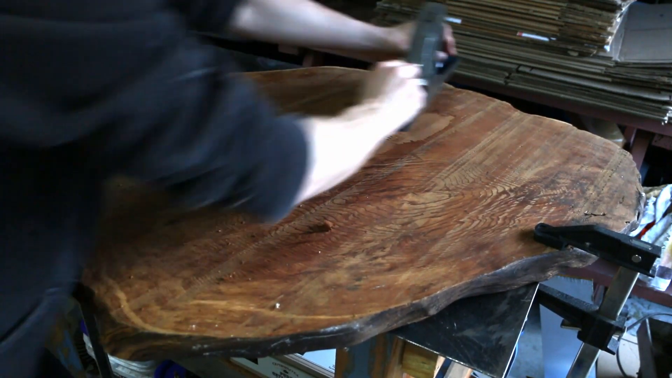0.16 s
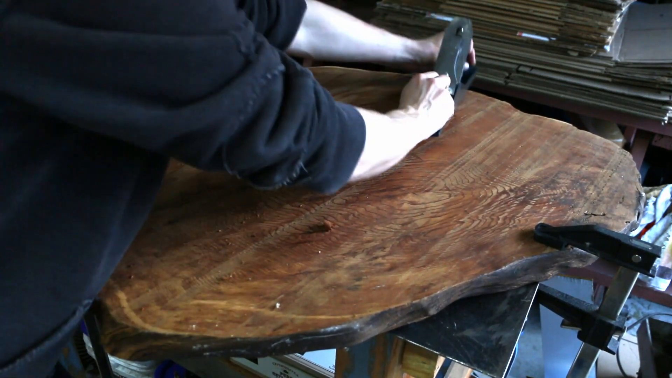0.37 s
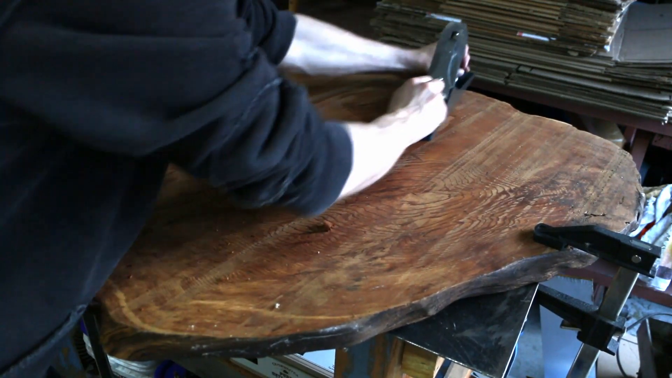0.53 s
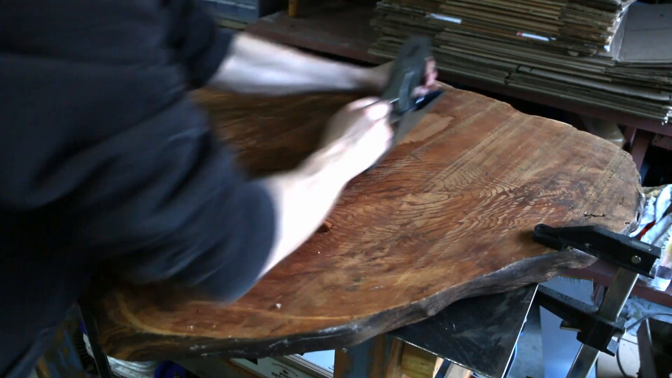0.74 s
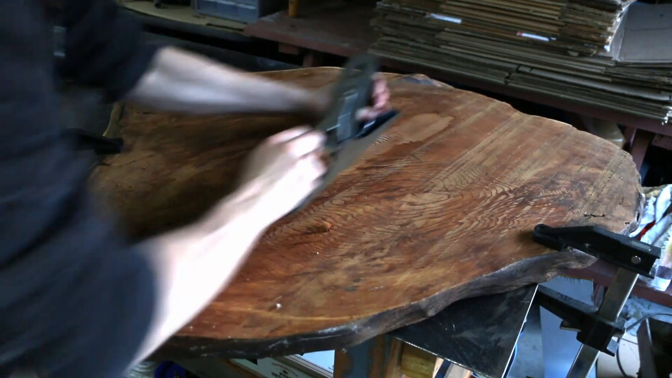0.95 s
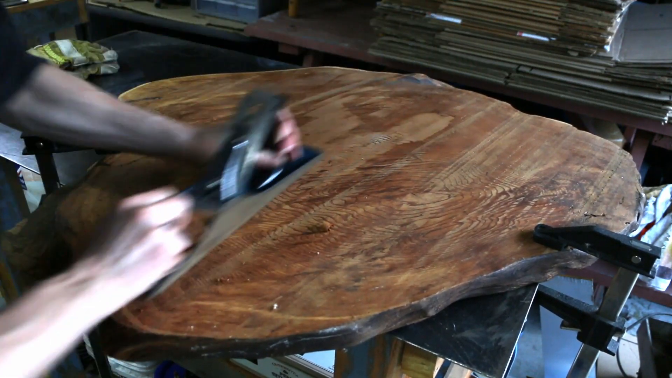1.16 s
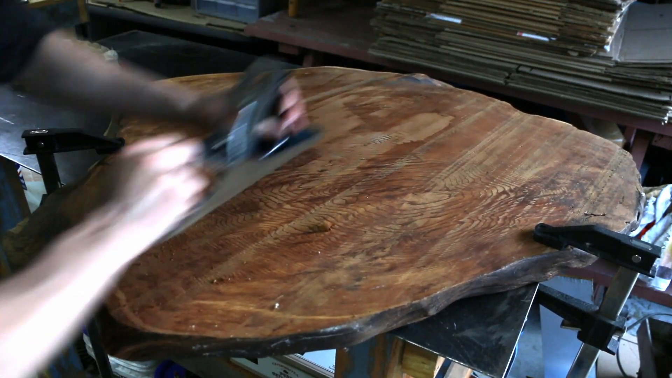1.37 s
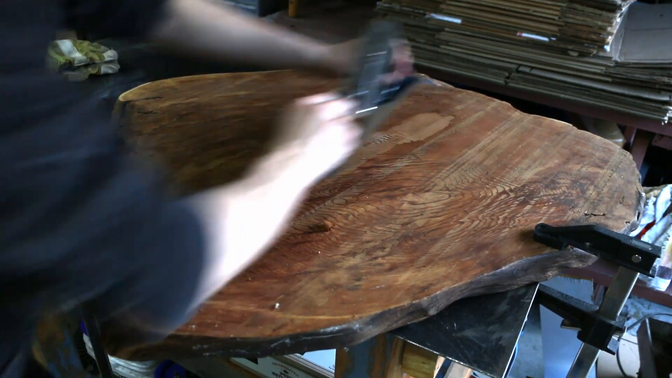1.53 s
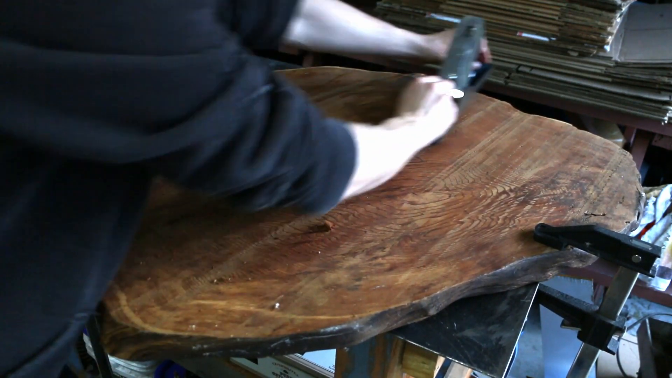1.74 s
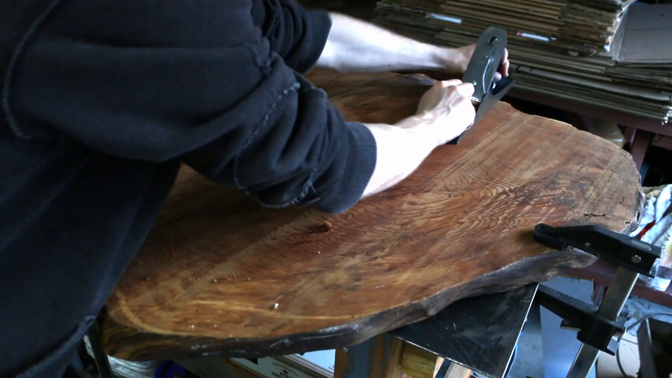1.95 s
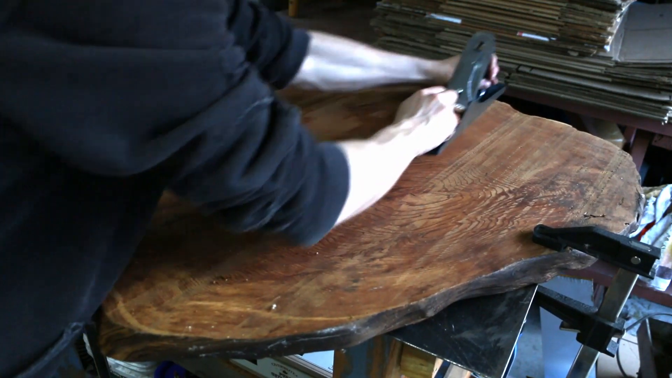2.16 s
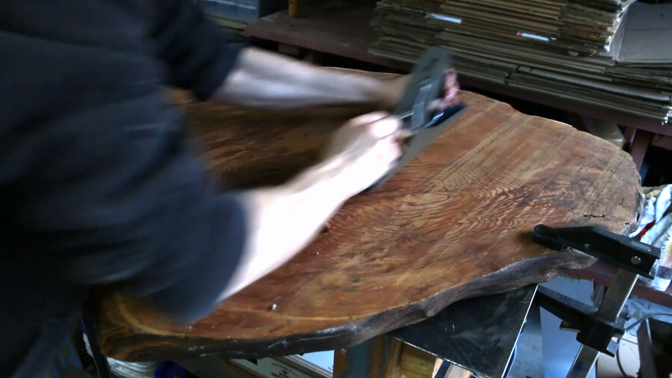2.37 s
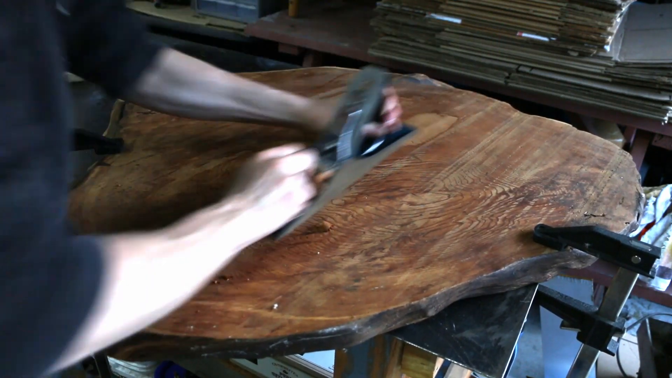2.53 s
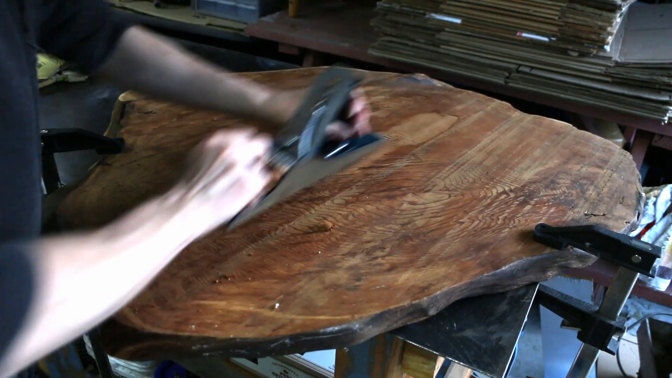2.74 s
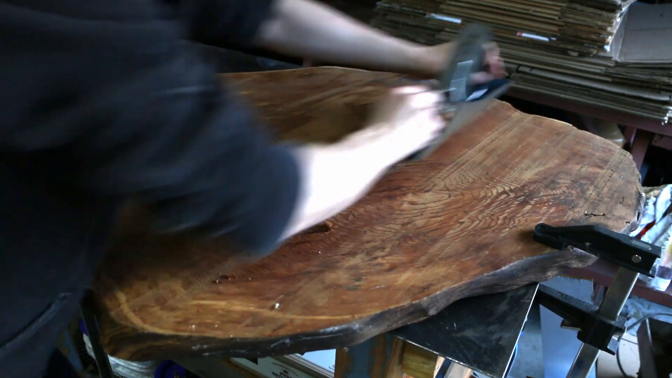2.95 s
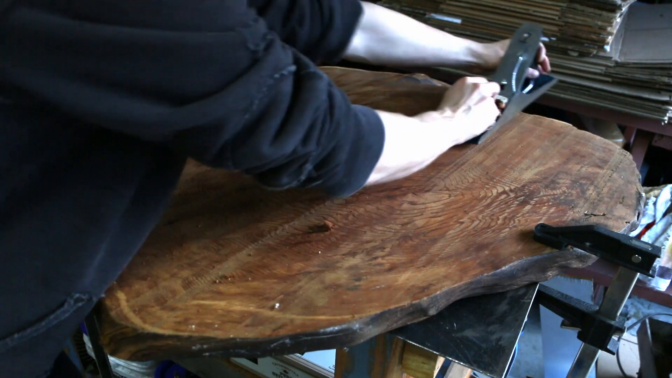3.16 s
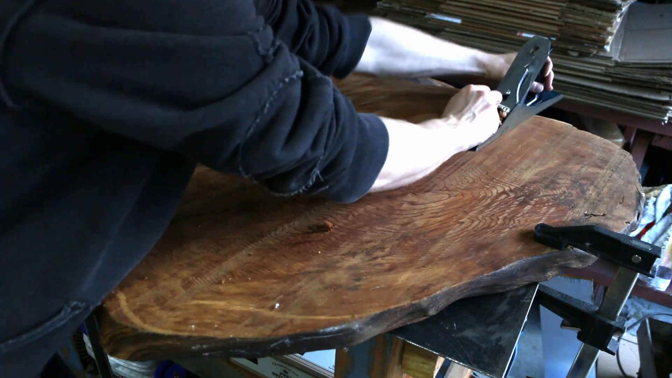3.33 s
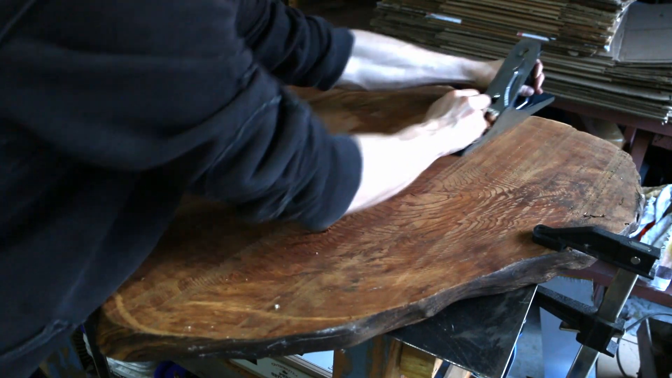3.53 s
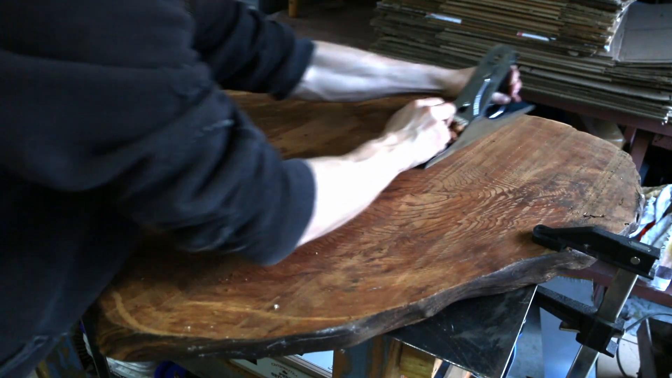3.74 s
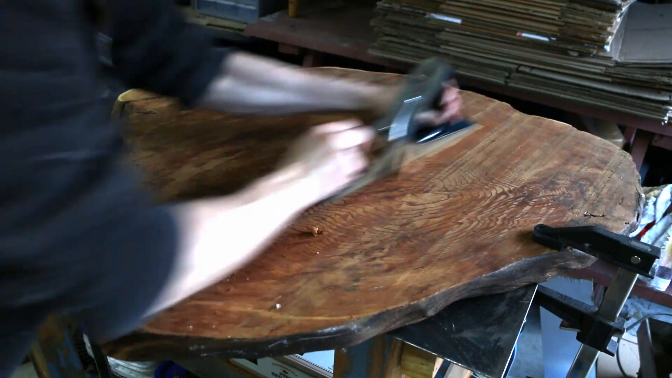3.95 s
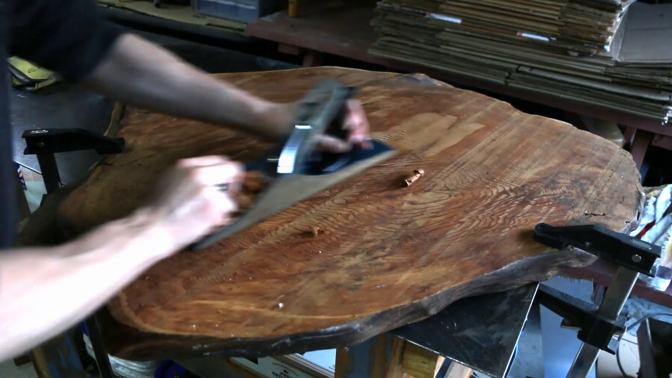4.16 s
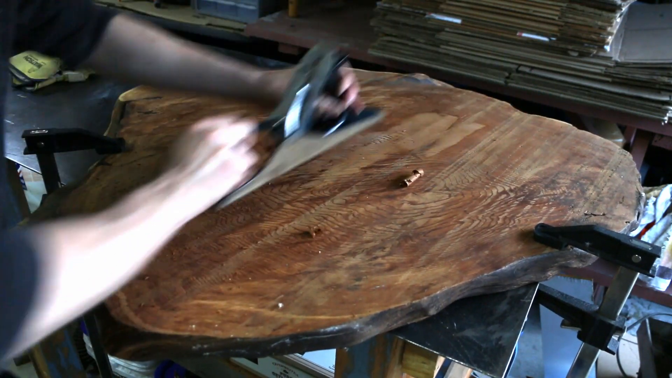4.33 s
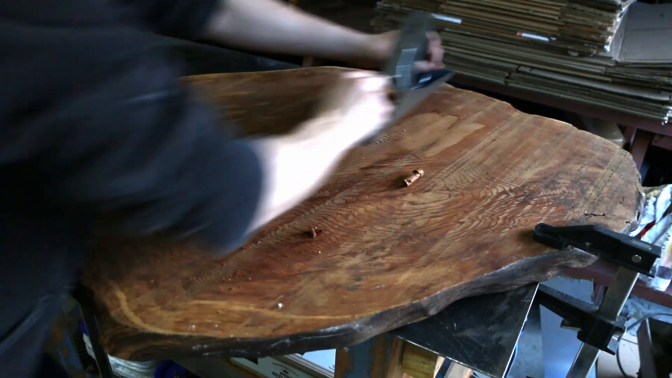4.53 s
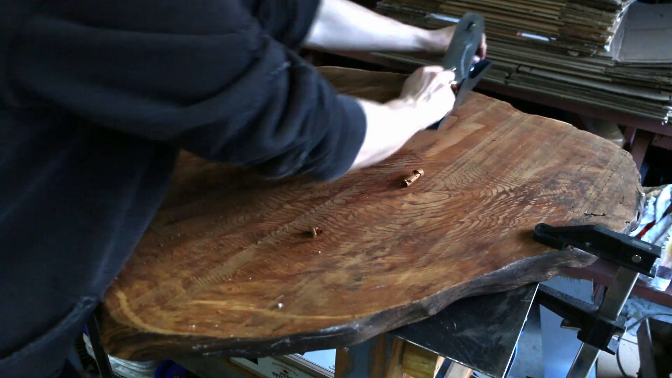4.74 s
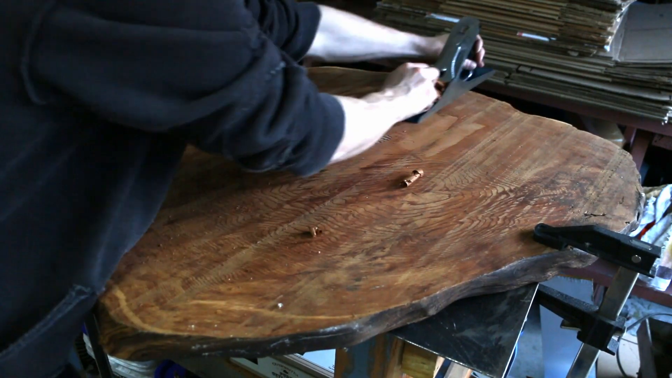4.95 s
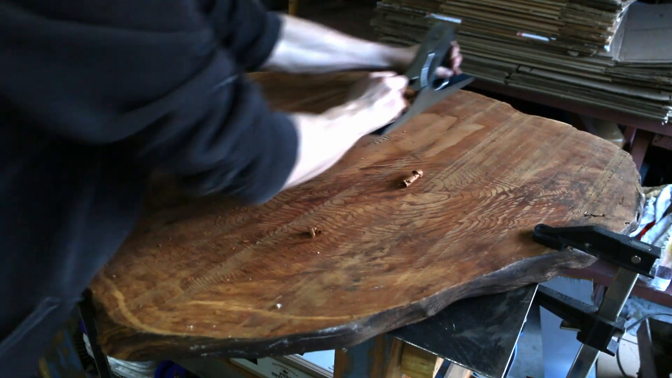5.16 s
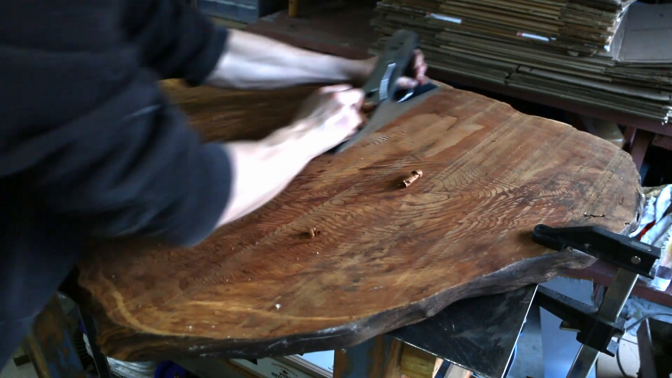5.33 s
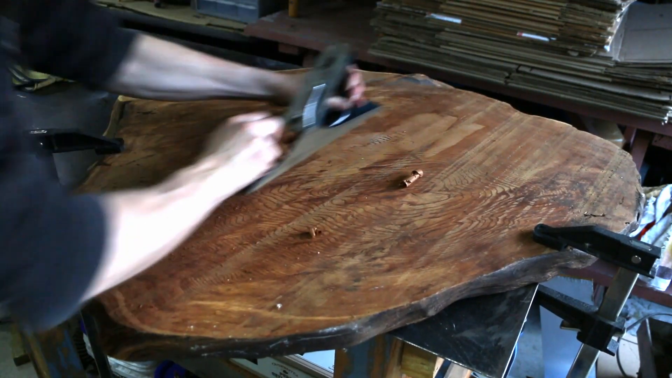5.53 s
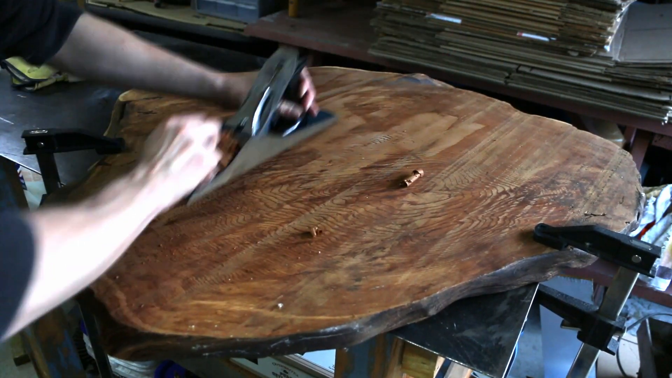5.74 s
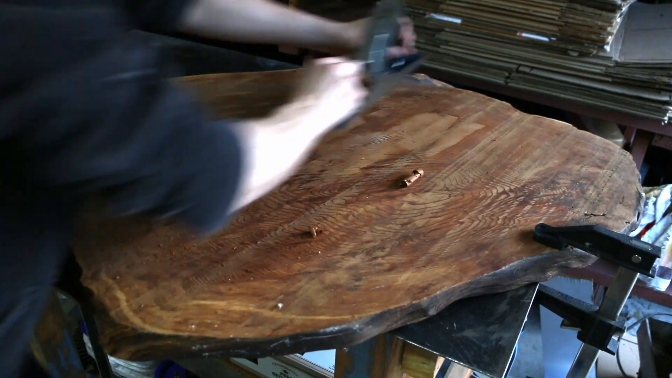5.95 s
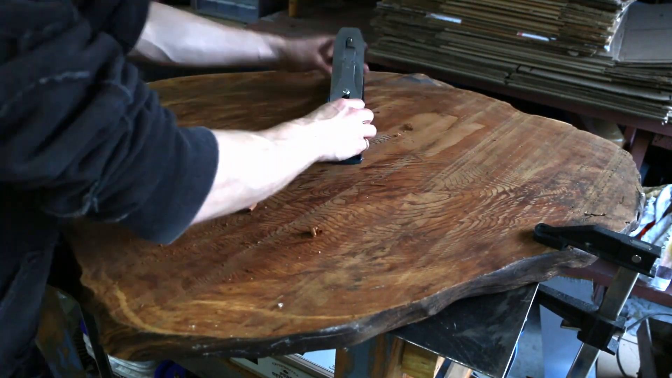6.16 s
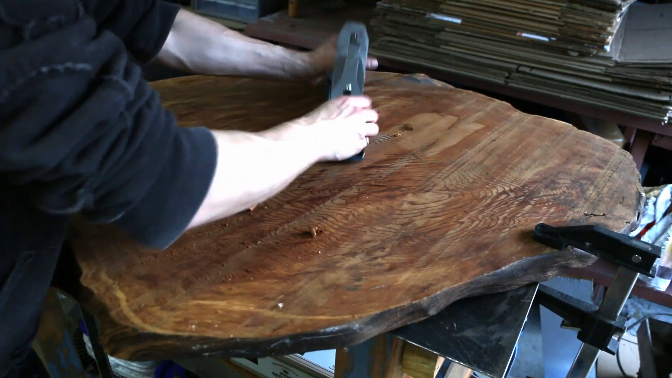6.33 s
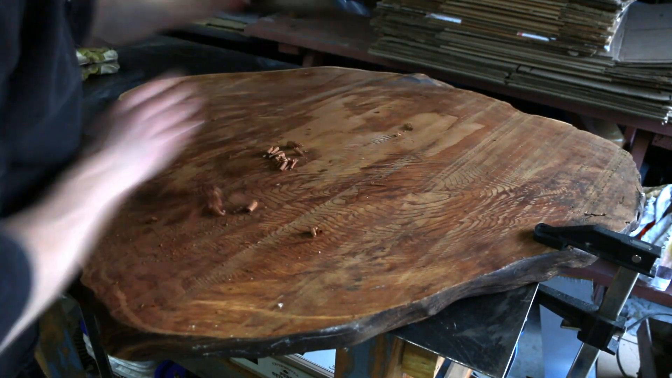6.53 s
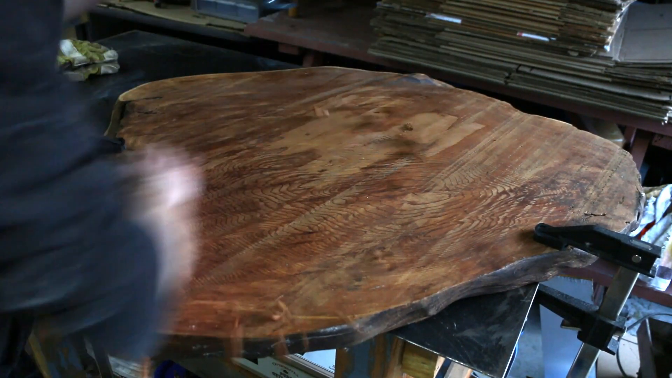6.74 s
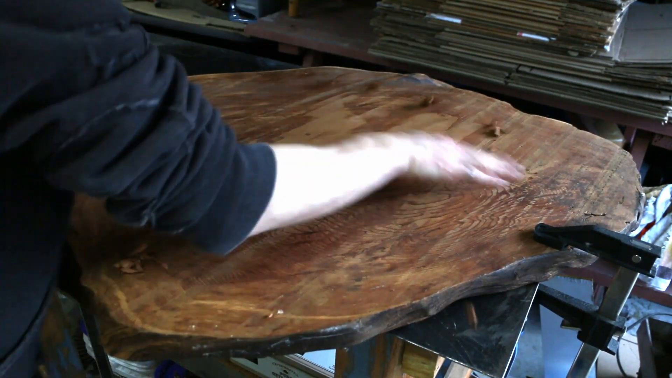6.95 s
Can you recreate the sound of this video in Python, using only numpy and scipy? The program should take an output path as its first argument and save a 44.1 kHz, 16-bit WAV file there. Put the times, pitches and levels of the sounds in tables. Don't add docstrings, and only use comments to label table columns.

```python
import sys
import numpy as np
from scipy import signal
from scipy.io import wavfile

SR = 44100
rng = np.random.default_rng(int(sys.argv[2]) if len(sys.argv) > 2 else 0)


def voltage_ratio(level):
    return 10 ** (np.asarray(level, float) / 20)


def file_out(sig):
    cols = np.atleast_2d(sig).T
    lim = np.clip(cols, -1, 1)
    pcm = np.round(lim * 32767).astype(np.int16)
    wavfile.write(sys.argv[1], SR, pcm)


N = 312669

# (frequency [Hz], level [dB per Hz])
HUSH = [(12, -30), (20, 3), (42, -3.5), (70, -3), (260, -1.5), (522, -6.5), (794, -9), (1020, -1.5),
        (1110, -8), (1510, -12), (10000, -19.5), (13600, -23.5), (15700, -26)]
# (frequency [Hz], likeness [0-1])
HUSH_LIKENESS = [(60, 0.57), (240, 0.62), (950, 0.24), (3770, 0.14), (15000, 0.21)]
# (frequency [Hz], likeness [0-1])
RUB_LIKENESS = [(60, 0.7), (130, 0.93), (290, 0.93), (640, 0.95), (1410, 0.83), (3100, 0.4), (6820, 0.3),
                (15000, 0.18)]
# (frequency [Hz], likeness [0-1])
BLOW_LIKENESS = [(60, 0.95), (180, 0.96), (550, 0.94), (1650, 0.86), (4970, 0.65), (15000, 0.3)]
# (frequency [Hz], left minus right [dB])
LEAN = [(60, -5), (240, -2), (950, -2.5), (3770, -4), (15000, 1)]
EDGES_HZ = 20 * 2 ** np.arange(0, 9.8, .4)
RANGE_EDGES_HZ = [450, 1500, 4500]
# (time [s], length [s], level [dB], brightness [dB per range])
RUSTLES = [(0.0, 0.013, -63, -5), (.08, 0.18, -71, -9), (1.37, .02, -74, 0), (1.434, 0.033, -77.5, -11.5),
           (1.776, 0.016, -72.5, -1), (3.027, .06, -64, 3.5), (3.199, 0.12, -64.5, 5.5),
           (4.373, 0.04, -76.5, -10.5), (4.477, 0.038, -76, -12), (4.6, .05, -77.5, -13.5),
           (4.708, 0.09, -66.5, 3), (6.065, .01, -78.5, -6), (6.29, 0.061, -66.5, -5),
           (6.4, 0.088, -67.5, 4), (6.577, 0.14, -60.5, 4.5), (6.782, 0.11, -61, 8), (6.93, 0.025, -74, -4)]
RUSTLE_DB = [-4.5, -1, -0.5, -10]
# (frequency [Hz], level [dB per Hz])
CLOTH = [(41, -72.5), (70, -22), (141, -11), (272, 5), (349, 12), (391, -25), (419, -2.5), (1740, -4),
         (15700, -20)]
# (time [s], level [dB rms], pitch [Hz], t60 [s])
SCUFFS = [
    (0.0, -54.5, 800, 0.41),
    (.06, -60.5, 2300, 0.16),
    (6.2, -36.5, 594, 0.24),
    (6.45, -56, 2560, 0.064),
    (6.61, -57, 7900, .08),
    (6.768, -45, 1460, 0.18),
    (6.775, -53, 3600, 0.17),
    (6.86, -51.5, 5470, 0.21),
]
# (time [s], level [dB rms], pitch [Hz], t60 [s])
SQUEALS = [(.135, -58, 2300, .18), (.66, -38.5, 2526, 0.24), (1.06, -56, 12500, .12),
           (1.07, -44, 5280, 0.11), (2.24, -30.5, 301.5, 0.47), (3.8, -40, 2700, 0.65),
           (.88, -43, 3350, 0.33), (3.975, -28.5, 1200, 0.11), (4.0, -28, 1230, 0.13),
           (4.15, -43.5, 3450, 0.1), (4.76, -61, 258, .4), (5.43, -34.5, 2446, 0.19),
           (5.49, -35, 2040, 0.098)]
# (time [s], level near 350 Hz [dB], and
# against it: boom of the bench [dB], slap of the sole [dB], hardness of the edge [dB])
LANDINGS = [(0.361, -26.5, -11, -1.5, 1.5), (0.4175, -20, -8.5, 4, 1.5), (1.439, -50, -34, -32.5, -16),
            (1.8311, -36.5, -10, -7, -21), (1.9592, -20, -15.5, 2, -5.5), (3.2866, -29, -10.5, -2, -15.5),
            (3.3326, -19.5, -14.5, 2, -23), (3.5845, -44, -23, 8, 4.5), (4.749, -41.5, -6.5, -8.5, -12),
            (4.8499, -37.5, -10, -4.5, -11.5), (4.9371, -22.5, -5.5, 5.5, -4.5),
            (6.196, -32, -3.5, -7.5, -18.5), (6.225, -39.5, -17.5, -3, -26)]
LANDING_HZ = [130, 350, 1000, 2800]
# (delay [s], level [dB])
ECHOES = [(.004, -3), (.011, -9), (.022, -7), (.036, -14)]
# (frequency [Hz], t60 [s], level [dB])
WASH = [(110, 0.39, -18.5), (149, 0.45, -23), (247, .25, -0.5), (384.3, 0.25, -13), (716, 0.27, -13),
        (986, 0.18, -7), (2020, 0.2, -9), (3894, 0.1, -7.5), (8940, 0.054, -18.5)]
# (frequency [Hz], level [dB], t60 [s])
CRACK = [(320, -7, .05), (900, -4, .035), (1600, -5, .022), (2400, -5, .018), (3500, -11, .014),
         (5500, -14, .01), (8500, -14, .008)]
# (frequency [Hz], level [dB], t60 [s])
SLAB = [(188.3, 3.5, 0.26), (244.4, 4.5, 0.099), (302.4, 10.5, 0.12), (360.6, -4, 0.36), (446.4, -9, 0.24),
        (535, -1.5, 0.2), (627, -1.5, 0.11), (753, -36, 0.067), (800, 7.5, 0.054), (880, 4.5, 0.11),
        (961, 6.5, 0.042), (954, 2, 0.15), (1058, -0.5, 0.22), (1200, -3, 0.073), (1320, -3.5, 0.05),
        (1603, 1, 0.039), (1695, -24.5, 0.2), (1853, 1, 0.085), (2130, 2.5, 0.12), (2200, 6.5, 0.04),
        (2570, -9.5, 0.069), (2670, 2, 0.076), (3100, -9, 0.083), (3200, -1, 0.13), (3450, 8, .06),
        (3940, -34, .06), (4100, 1.5, 0.04), (5100, -21.5, .05)]
# (frequency [Hz], level [dB], t60 [s])
BENCH = [(104, -11, .7), (130, -2, .9)]
# (time [s],
# level [dB # rms], pitch [Hz], t60 [s])
SNAGS = [(.361, -41.5, 4600, .07), (1.96, -27.5, 1470, 0.18), (3.287, -50, 2900, 0.13),
         (2.302, -35, 687, 0.15), (3.548, -40.5, 530, 0.34), (3.59, -31, 725, 0.081),
         (3.607, -35, 2300, .037), (3.61, -38.5, 700, 0.31), (3.709, -31, 570, 0.14),
         (4.065, -37.5, 327, 0.087), (5.209, -50, 890, .053), (6.2, -47.5, 1790, 0.31),
         (6.226, -57, 1730, 0.14)]
# (time [s], speed of the iron as its hiss [dB], weight on the sole as its drone [dB])
STROKES = [
    [(0.52, -68, -55), (0.586, -55.5, -45), (0.854, -47.5, -41.5), (0.94, -48.5, -40.5), (0.952, -45, -43),
     (1.01, -44.5, -41), (1.15, -51, -45), (1.212, -57.5, -44), (1.36, -89, -70)],
    [(2.06, -88.5, -46), (2.11, -51, -45.5), (2.158, -47.5, -38.5), (2.316, -46, -36.5),
     (2.414, -44.5, -45.5), (2.538, -48.5, -43), (2.666, -63.5, -53.5), (2.678, -75, -56), (2.8, -95, -82)],
    [(3.43, -63, -50.5), (3.502, -63, -51.5), (3.596, -50.5, -40), (3.944, -44, -39.5),
     (4.01, -46.5, -34.5), (4.038, -43, -36), (4.17, -59.5, -42.5), (4.25, -85.5, -61.5),
     (4.34, -97, -63.5)],
    [(5.06, -61, -57.5), (5.102, -64.5, -62.5), (5.276, -57.5, -50.5), (5.298, -50.5, -46.5),
     (5.492, -46, -44), (5.59, -53, -51.5), (5.65, -56.5, -48.5), (5.768, -87, -79), (5.8, -81.5, -81)],
]
CUT_DB = [-47.5, -39, -38.5, -46]
FROM_SPEED = [0.018, .02, 0.59, 1]
FROM_WEIGHT = [.6, 1, 0.32, .02]
# (frequency [Hz], level [dB per Hz])
CUT = [(41, -63), (70, -65), (121, -26), (222, -22.5), (285, 5.5), (428, -6.5), (525, 0.5), (721, -0.5),
       (807, -3.5), (925, -7.5), (1190, -1), (1490, -3), (3290, -10), (12200, -33.5), (15700, -48.5)]
# (frequency [Hz], width [Hz], level [dB])
IRON = [(250, 24, -43), (130.2, 6.8, -26.5), (183.4, 4.4, -12.5), (313.7, 9.8, -2), (495.5, 10, -3),
        (530, 3.8, -5.5), (568, 4.3, -13), (774.7, 30, -2), (843.4, 37, -4.5), (1003, 4.3, -6.5),
        (1057, 13, -11), (1140, 24, -48), (1216, 14, -15.5), (1393, 20, -5.5), (1678, 10, -11),
        (2110, 28, -26), (2300, 22, -8), (2460, 50, -10.5), (2700, 25, -53), (3235, 30, -18),
        (5340, 300, -16.5), (7380, 1100, -13.5), (10040, 75, -32.5), (12500, 950, -24)]
# (time [s], peak level [dB])
SHUDDERS = [
    (1.003, -57),
    (1.251, -60),
    (2.419, -51.5),
    (2.618, -54),
    (4.001, -47.5),
    (4.149, -50.5),
    (5.622, -64),
]
# (frequency [Hz], level [dB], t60 [s])
APRON = [(192, 3, .4)]


def rms_one(x):
    return x / np.sqrt(np.mean(x ** 2) + 1e-30)


def at_hz(points, hz):
    table = np.array(points)
    return np.interp(np.log(hz), np.log(table[:, 0]), table[:, 1])


def filtered(x, order, hz, kind):
    return signal.sosfilt(signal.butter(order, hz, kind, fs=SR, output="sos"), x)


def leaning(x, hz):
    return x * voltage_ratio(at_hz(LEAN, hz) / 2 * np.array([[1], [-1]]))


def spread(pair, likeness, hz):
    alike = np.sqrt(np.clip((at_hz(likeness, hz) - .2) / .76, 0, 1))
    shared = np.sqrt(1 + alike) * pair[0]
    unshared = np.sqrt(1 - alike) * pair[1] * [[1], [-1]]
    return leaning(shared + unshared, hz) / np.sqrt(1 + alike)


def bands(source, gain, likeness, first=0):
    for k, (low, high) in enumerate(zip(EDGES_HZ[first:], EDGES_HZ[first + 1:])):
        hz = np.sqrt(low * high)
        band = filtered(source[k % 2] * gain(hz), 2, [low, high], "band")
        yield hz, spread(band, likeness, hz)


def hush():
    noise = rng.standard_normal((2, 2, N))
    tone = sum(band for hz, band in bands(noise, lambda hz: voltage_ratio(at_hz(HUSH, hz)), HUSH_LIKENESS))
    return voltage_ratio(-63 + 1.5) * rms_one(tone)


def drift(rate):
    r = np.exp(-80 * np.pi * rate / SR)
    slow = signal.lfilter([1], [1, -2 * r, r * r], rng.standard_normal(N // 40 + 2002))[2000:]
    return np.interp(np.arange(N) / 40, np.arange(len(slow)), rms_one(slow))


def grains(per_s, spread_db):
    shape = (2, 2, N)
    sizes = voltage_ratio(spread_db * np.minimum(rng.exponential(1, shape), 5))
    sizes = sizes * rng.choice([-1, 1], shape)
    return rms_one(sizes * (rng.random(shape) < per_s / SR) + 1e-9)


def resonance(x, hz, width_hz):
    r = np.exp(-np.pi * width_hz / SR)
    poles = [1, -2 * r * np.cos(2 * np.pi * hz / SR), r * r]
    return signal.lfilter(np.array([1, 0, -1]) * (1 - r * r) / 2, poles, x)


def friction(levels, spectrum, source, patchy_db, peaks=(), flutter_db=0):
    ranges, together = np.zeros((4, 2, N)), drift(9.3)

    def patch(hz):
        return voltage_ratio(at_hz(spectrum, hz) + patchy_db * (0.3 * together + drift(24)))

    for hz, band in bands(source, patch, RUB_LIKENESS, first=6):
        ranges[np.searchsorted(RANGE_EDGES_HZ, hz)] += band
    for hz, width_hz, db in peaks:
        rung = rms_one(resonance(source[0] * voltage_ratio(flutter_db * drift(9)), hz, width_hz))
        ranges[np.searchsorted(RANGE_EDGES_HZ, hz)] += spread(rung, RUB_LIKENESS, hz) * voltage_ratio(db - 18)
    return sum(rms_one(part) * level for part, level in zip(ranges, levels))


def stirring():
    rise_db_per_s, fall_db_per_s = 350, 197.5
    t, out = np.arange(N) / SR, 0
    for s, length, db, bright_db in RUSTLES:
        before, after = np.maximum(s - t, 0), np.maximum(t - s - length, 0)
        shape = voltage_ratio(db - rise_db_per_s * before - fall_db_per_s * after)
        tilt = voltage_ratio(RUSTLE_DB + bright_db * (np.arange(4) - 1.5))
        out = out + np.outer(tilt, shape)
    return out


def rustles():
    return friction(stirring(), CLOTH, grains(8200, 2.7), patchy_db=1.2)


def catches(rows, width, rise):
    out, t = np.zeros((2, N + SR)), np.arange(SR // 2) / SR
    for s, db, hz, t60 in rows:
        envelope = (1 - np.exp(-t / (rise * t60))) * voltage_ratio(-60 * t / t60)
        puff = rng.standard_normal((2, len(t))) * envelope
        rung = resonance(resonance(puff, hz, width * hz), hz, 2 * width * hz)
        rung = rung * np.sqrt(SR / np.pi / width / hz)
        out[:, round(s * SR):][:, :len(t)] += spread(rung, RUB_LIKENESS, hz) * voltage_ratio(db + 6.5)
    return out[:, :N]


def scuffs():
    return catches(SCUFFS, width=.65, rise=.07)


def squeals():
    return catches(SQUEALS, width=.11, rise=.1)


def ring(clicks, hz, t60):
    r, w = voltage_ratio(-60 / (t60 * SR)), 2 * np.pi * hz / SR
    return leaning(signal.lfilter([0, np.sin(w)], [1, -2 * r * np.cos(w), r * r], clicks), hz)


def blows(hz, scatter_db=0):
    rows, clicks = np.array(LANDINGS), np.full(N, 1e-18)
    colour = np.array([np.interp(np.log(hz), np.log(LANDING_HZ), [boom_db, 0, slap_db, edge_db])
                       for s, db, boom_db, slap_db, edge_db in rows])
    colour = colour - 17 * max(0, np.log2(hz / LANDING_HZ[-1]))
    colour = colour + 12 * min(0, np.log2(hz / 100))
    chance = rng.standard_normal((len(rows), 2))
    way = np.sign(chance[:, 1]) if scatter_db and hz > 420 else 1
    clicks[(rows[:, 0] * SR).astype(int)] = way * voltage_ratio(rows[:, 1] + colour + scatter_db * chance[:, 0])
    return clicks


def echoed(clicks):
    return clicks + sum(voltage_ratio(db) * np.roll(clicks, int(late * SR)) for late, db in ECHOES)


def dying(clicks, t60):
    return signal.lfilter([1], [1, -voltage_ratio(-60 / (t60 * SR))], clicks)


def blow_wash():
    wash = np.array(WASH)

    def envelope(hz):
        clicks, t60 = blows(hz) * np.sqrt(SR / hz), at_hz(wash, hz)
        tail = voltage_ratio(-14) * dying(clicks, 2.55 * t60)
        return voltage_ratio(at_hz(wash[:, ::2], hz)) * (dying(clicks, t60) + tail)

    noise = rng.standard_normal((2, 2, N))
    return sum(band for hz, band in bands(noise, envelope, BLOW_LIKENESS, first=6))


def landings():
    out = blow_wash()
    out += sum(ring(echoed(blows(hz)), hz, t60) * voltage_ratio(db + 2.5) for hz, db, t60 in CRACK)
    out += sum(ring(blows(hz, scatter_db=2.2), hz, t60) * voltage_ratio(db - 8) for hz, db, t60 in SLAB)
    out = filtered(out, 2, 140, "high")
    out += sum(ring(blows(hz), hz, t60) * voltage_ratio(db - 8) for hz, db, t60 in BENCH)
    return filtered(out, 3, 7200, "low")


def snags():
    return catches(SNAGS, width=.28, rise=.015)


def in_time(spans):
    t, (s, *columns) = np.arange(N) / SR, np.transpose(np.concatenate(spans))
    away = np.min([np.maximum(rows[0][0] - t, t - rows[-1][0]) for rows in spans], axis=0)
    return [np.interp(t, s, c) for c in columns], np.clip(1 - away / .03, 0, 1)


def effort():
    (speed_db, weight_db), touching = in_time(STROKES)
    speed_swing, weight_swing = speed_db + 47, weight_db + 40
    return [touching * voltage_ratio(db + a * speed_swing + b * weight_swing)
            for db, a, b in zip(CUT_DB, FROM_SPEED, FROM_WEIGHT)]


def planing():
    return friction(effort(), CUT, grains(4000, 2.2), patchy_db=.8, peaks=IRON, flutter_db=2.6)


def shudders():
    clicks = np.full(N, 1e-18)
    for s, db in SHUDDERS:
        clicks[round(s * SR)] = voltage_ratio(db)
    soft = filtered(clicks, 2, 200, "low")
    return sum(ring(soft, hz, t60) * voltage_ratio(db) for hz, db, t60 in BENCH + APRON)


def scene():
    work = rustles() + scuffs() + squeals() + landings() + snags() + planing() + shudders()
    return filtered(work, 6, 92, "high") + hush()


def roll_off(x):
    return signal.sosfilt(signal.butter(12, 15830, fs=SR, output="sos"), x)


def record(dry):
    mix = signal.sosfilt(signal.cheby2(16, 60, 16200, fs=SR, output="sos"), dry)
    return roll_off(mix)


dry = scene()
out = record(dry)
file_out(out)
```